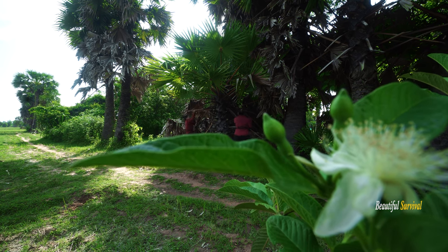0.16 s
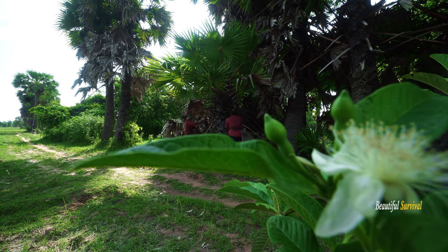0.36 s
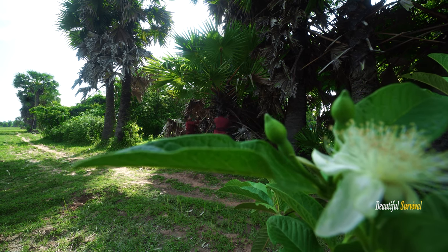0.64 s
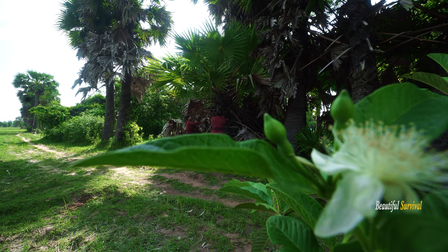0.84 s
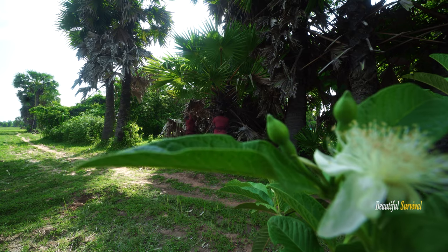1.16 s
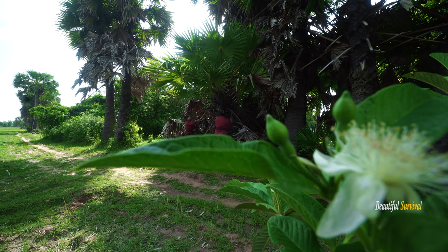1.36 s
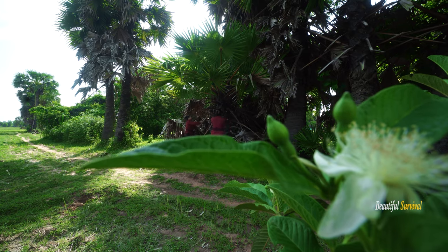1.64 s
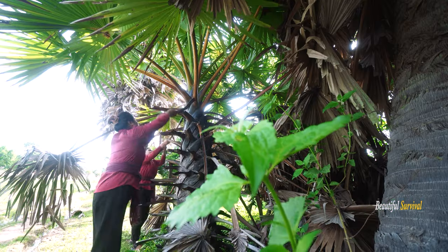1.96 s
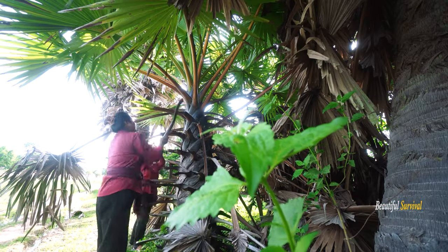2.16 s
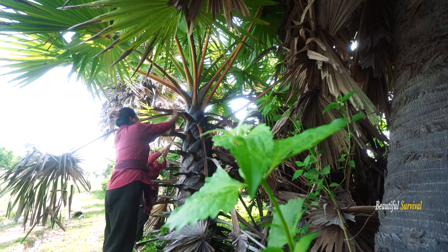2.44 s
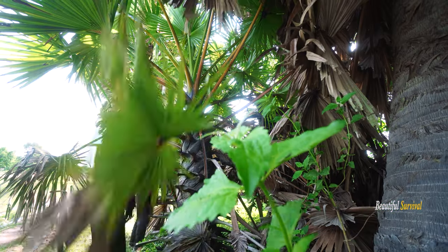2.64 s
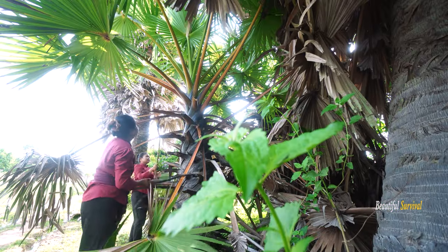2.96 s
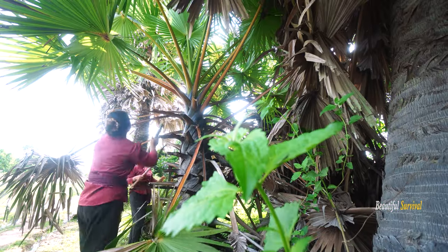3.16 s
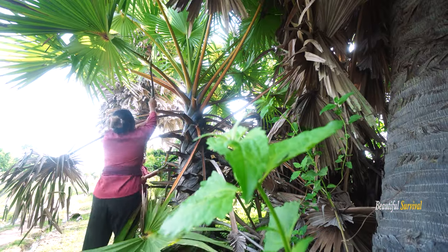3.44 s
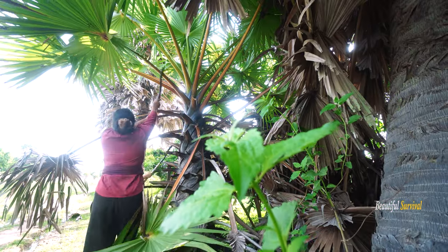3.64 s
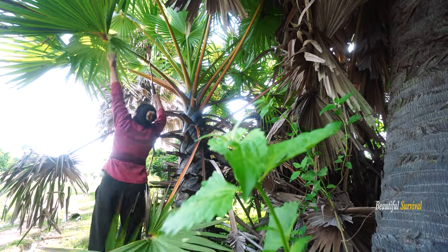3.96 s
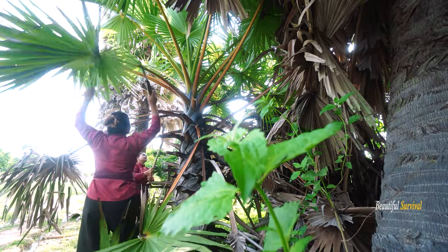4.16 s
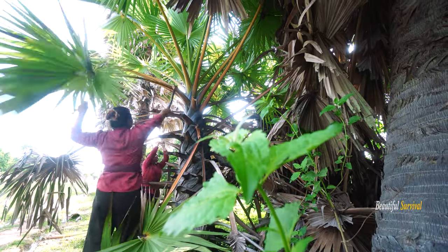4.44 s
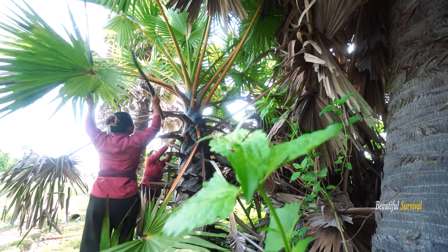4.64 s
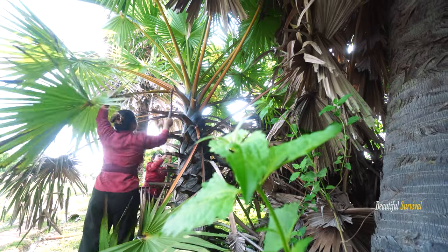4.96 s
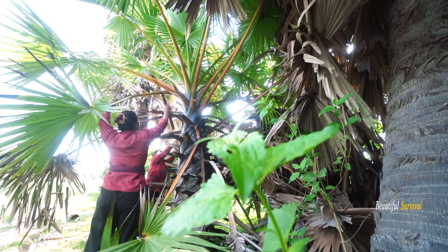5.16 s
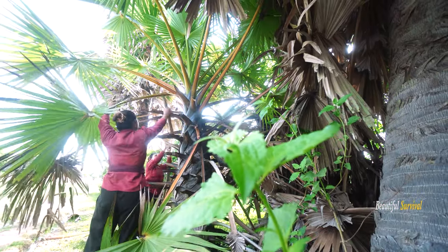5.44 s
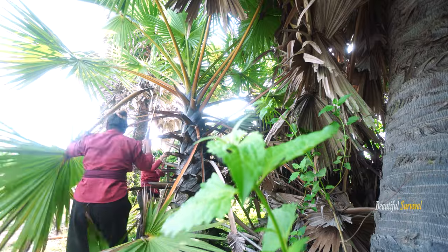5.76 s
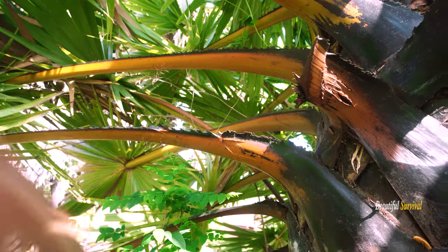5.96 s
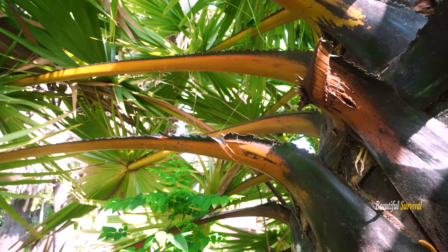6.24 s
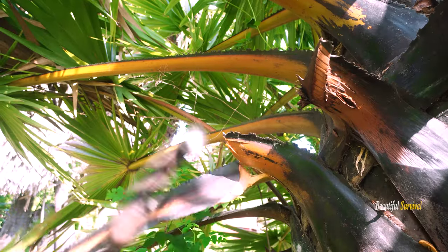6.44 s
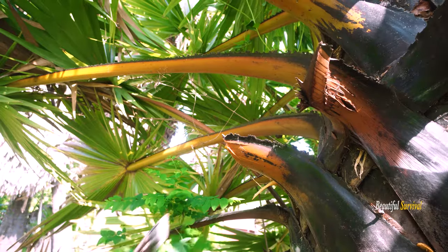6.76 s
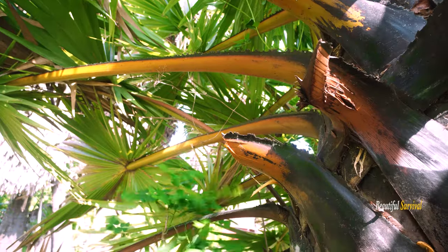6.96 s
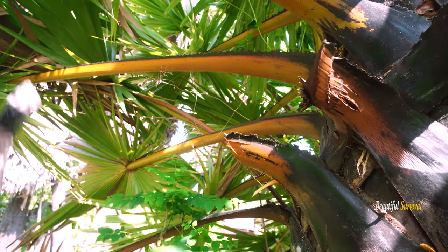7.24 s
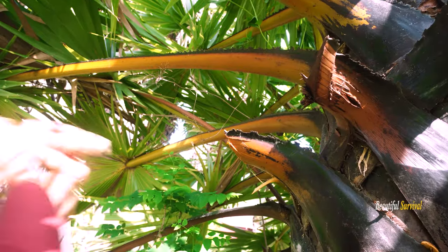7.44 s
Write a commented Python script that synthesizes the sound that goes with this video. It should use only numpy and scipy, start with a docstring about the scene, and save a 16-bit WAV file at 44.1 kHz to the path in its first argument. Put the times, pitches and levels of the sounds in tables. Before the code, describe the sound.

A quiet outdoor grove with soft air and a faint, distant hum rising in small swells. From 0 to 2 s, a few weak, distant knife chops fall around 0.7, 1.3 and 1.7 s, with dry leaf clicks and slight rustling. From 2 s the work is nearer: woody knocks at 2.4 to 2.9 s with crisp fibre cracks, clacking stalks and stiff leaves swishing. Between 3.4 and 3.8 s the blade rasps lightly to and fro, and thin, high bird whistles appear until about 5.2 s. Separate chops follow at 4.0, 4.4, 4.6, 4.9, 5.2, 5.5 and 5.7 s. At 6 s everything becomes much louder and close: heavy resonant hacks two to four times a second, splitting wood, tearing fibres, very sharp snaps, and a strong dry frond rustle peaking around 6.4 to 6.9 s. Final hard blows land at 7.0, 7.4 and 7.6 s, with a short woody echo.

```python
"""Cutting palm fronds with a heavy knife

Outdoors, fronds are hacked off a fan palm: first some way off, then much louder, right beside the stalk.
Each blow sets off decaying notes and resonances for the stalk, and showers of tiny cracks for its fibres.
Filtered noise and cracks make the stiff leaves rustle, snap and slide; rough noise makes the blade rasp.
Behind lie still air (soft noise), a climbing hum over a steady tone, and thin bird whistles (gliding sines).
"""
import sys
import numpy as np
from scipy import signal
from scipy.io import wavfile

SR = 44100
rng = np.random.default_rng(int(sys.argv[2]) if len(sys.argv) > 2 else 0)


def transcribe(u):
    """Save the signal u as a 16-bit wav file named by the first command-line argument.

    u: samples, shape (n,) or (channels, n), limited to [-1, 1]; the rate is SR.
    q: integer samples, one column per channel.
    """
    v = np.clip(np.atleast_2d(u).T, -1, 1)
    q = np.round(v * 32767).astype(np.int16)
    wavfile.write(sys.argv[1], SR, q)


N = 335160
TIME = np.arange(N) / SR   # seconds

# Levels in the event tables are starting points: the functions trim and filter them further.
# knife blows: [t/s, thud level/dB, knock level/dB, first crack level/dB, tearing fibres level/dB,
#               extra treble level/dB, cutting time t/s, thud of the frond f/Hz, note of the stalk f/Hz]
KNIFE_BLOWS = [(0.687, -32.5, -32, -17, -24.5, -3.5, 0.041, 489, 888),
               (0.8443, -39, -36.5, -25, -30.5, 9, 0.019, 297, 2880),
               (1.297, -29.5, -33, -22, -24.5, 0.5, 0.032, 504, 3390),
               (1.6359, -37.5, -43, -23.5, -33.5, 10, 0.038, 337, 3140),
               (1.705, -30, -33.5, -19, -25, -0.5, 0.03, 515, 830),
               (2.406, -30.5, -25.5, -21, -37.5, 6, 0.015, 255, 1560),
               (2.5145, -28, -32.5, -15.5, -29.5, 1.5, 0.073, 363, 1120),
               (2.575, -29, -25, -26, -40, -13, 0.0045, 705, 2800),
               (2.853, -29.5, -33, -20, -29.5, 4.5, 0.0077, 393, 1571),
               (2.877, -27.5, -30.5, -15, -26.5, -6, 0.021, 412, 825),
               (4.001, -25.5, -29.5, -27, -37, 0, 0.0036, 636, 1015),
               (4.4344, -31, -29.5, -12.5, -33, -5, 0.021, 640, 1860),
               (4.642, -29, -27, -17, -25.5, -4, 0.013, 567, 2660),
               (4.86, -26.5, -24.5, -17, -27, -21, 0.0029, 569, 3440),
               (5.2458, -26.5, -27.5, -19.5, -27, 3, 0.016, 700, 1040),
               (5.5404, -27.5, -28, -20, -29, 0.5, 0.034, 580, 1400),
               (5.6534, -26.5, -27.5, -13.5, -26, -12, 0.027, 414, 975),
               (5.982, -22, -20, -5.5, -16.5, -3, 0.049, 401, 1270),
               (6.066, -18.5, -20, -20, -18.5, 1.5, 0.027, 486, 1020),
               (6.3145, -21.5, -15.5, -11, -17.5, 2.5, 0.027, 480, 1510),
               (6.408, -23.5, -25.5, 1, -33, -5, 0.022, 560, 1490),
               (6.655, -21, -16.5, -13, -13, -18, 0.016, 466, 1490),
               (6.711, -21.5, -20.5, -10, -19, 2.5, 0.0074, 541, 810),
               (7.018, -17.5, -15.5, -13, -14.5, -1.5, 0.011, 491, 1540),
               (7.3635, -22, -16, -17, -16.5, -7.5, 0.02, 480, 1986),
               (7.5726, -19, -22, -5, -18.5, -0.5, 0.054, 715, 1410)]
# leaf ribs snapping and stalks bumping: [t/s, wood level/dB, crackle level/dB, length t/s]
RIB_SNAPS = [(0.043, -41.5, -41, 0.005), (1.181, -59, -35.5, 0.012), (2.018, -36.5, -31.5, 0.012),
             (2.084, -38.5, -32, 0.006), (2.334, -38.5, -44, 0.0037), (2.482, -39, -31, 0.0045),
             (2.758, -38, -31, 0.0072), (2.959, -31.5, -27, 0.013), (3.396, -36, -32.5, 0.021),
             (3.541, -35.5, -34, 0.016), (3.685, -41.5, -36, 0.031), (3.959, -39, -48, 0.024),
             (4.554, -34, -25, 0.014), (4.768, -39.5, -43, 0.011), (4.816, -38.5, -41, 0.012),
             (5.855, -35, -23, 0.0046), (5.876, -29, -27, 0.0042), (5.928, -34, -38, 0.0066),
             (6.053, -18, -11, 0.0059), (6.207, -30.5, -23.5, 0.009), (6.645, -30, -15.5, 0.0027),
             (6.773, -27, -16, 0.0027), (7.2555, -32.5, -32, 0.0027)]
# single dry leaf pleats that click: [t/s, level/dB]
PLEAT_CLICKS = [(0.055, -31), (0.3908, -25), (0.629, -31), (0.886, -25), (1.899, -32.5), (2.098, -22.5),
                (3.884, -36), (4.152, -25.5), (4.381, -39), (4.793, -29), (5.05, -33.5), (6.0435, -10),
                (6.7515, -7), (6.918, -14), (6.976, -17.5), (7.002, -18), (7.2335, -23)]
# stalks clacking against each other: [t/s, level/dB, note f/Hz]
STALK_CLACKS = [(2.074, -30.5, 368), (2.617, -23, 604), (2.761, -25.5, 2720), (2.962, -23, 417),
                (3.039, -29, 2000), (3.378, -29, 614), (3.71, -36, 595), (3.96, -31, 1200),
                (5.876, -25, 1890), (6.721, -9, 2920)]
# the blade rasping to and fro in a hollow stalk: [t/s, length t/s, level/dB]
BLADE_STROKES = [(3.371, 0.061, -36.5), (3.527, 0.05, -36), (3.655, 0.074, -37.5), (3.739, 0.013, -36)]
# a frond is pulled or swings back: [t/s, time kept moving t/s, leaf rustle level/dB, stalk scrape level/dB]
FROND_PULLS = [(0.072, 0.1, -39.5, -54.5), (0.279, 0.31, -44.5, -55), (1.18, 0.048, -40.5, -62),
               (1.77, 0.038, -41, -63), (1.997, 0.16, -40, -42), (2.561, 0.13, -24.5, -36),
               (2.748, 0.053, -25, -30.5), (2.989, 0.077, -34, -44.5), (3.048, 0.084, -28, -35),
               (3.499, 0.081, -40, -46), (3.977, 0.04, -42.5, -38), (4.076, 0.07, -47, -48),
               (4.46, 0.075, -42.5, -40), (4.688, 0.04, -29, -39), (5.031, 0.077, -48, -49),
               (5.281, 0.099, -33, -36.5), (5.671, 0.14, -37, -37), (5.85, 0.113, -41, -39.5),
               (6.1, 0.072, -27.5, -32), (6.279, 0.1, -23, -28), (6.415, 0.079, -14.5, -21.5),
               (6.501, 0.11, -13, -25), (6.715, 0.097, -18, -22), (6.794, 0.095, -15, -27.5),
               (7.072, 0.068, -28.5, -30.5), (7.41, 0.057, -40.5, -42), (7.548, 0.008, -29.5, -44.5)]
# the crown keeps stirring between pulls: [t/s, leaf rustle level/dB]
CROWN_STIR = [(0, -46.5), (0.22, -54.5), (0.8, -52.5), (1.1, -47), (1.42, -51.5), (1.62, -66.5),
              (1.85, -48.5), (1.97, -52.5), (2.25, -44.5), (2.4, -51.5), (2.85, -33), (3.25, -47.5),
              (4.24, -44.5), (4.33, -56.5), (4.93, -46), (5.22, -49), (6.7, -26.5), (7.23, -37),
              (7.33, -45.5)]
# dull bumps through the trunk: [t/s, level/dB]
TRUNK_BUMPS = [(6.054, -25), (6.411, -26), (6.711, -30)]
# thin bird whistles: [t/s, length t/s, start f/Hz, end f/Hz, level/dB]
BIRD_WHISTLES = [(3.59, 0.045, 10100, 8900, -45), (3.795, 0.05, 8700, 8500, -46.5),
                 (3.94, 0.04, 10100, 9150, -45), (4.057, .09, 8150, 8550, -51),
                 (4.585, 0.082, 8350, 8000, -47), (5.03, 0.12, 8900, 9400, -49),
                 (5.165, 0.056, 8650, 8400, -51)]
# swells of the distant hum: [t/s, length t/s, start f/Hz, end f/Hz, level at the start/dB]
HUM_SWELLS = [(0, .2, 311, 327, -56.5), (0.235, 0.35, 271, 339, -53), (0.885, 0.38, 283, 336.5, -56),
              (1.3, 0.26, 285, 340, -60), (1.8, 0.296, 279, 346, -55), (4.295, 0.13, 272, 298, -51)]

# Resonances, with levels relative to each other.
# the stalk at first contact: [f/Hz, width f/Hz, level/dB]
CONTACT_MODES = [(1486, 150, 4), (1796, 100, 5.5), (3620, 330, -9)]
# the frond stalk as it splits: [f/Hz, width f/Hz, level/dB]
STALK_MODES = [(480, 47, 6), (640, 67, 1), (1291, 49, 4), (1500, 44, 9.5), (1730, 38, 2), (1980, 35, 10.5)]
# the hollow stalk, with the thin squeal of the blade on top: [f/Hz, width f/Hz, level/dB]
HOLLOW_MODES = [(610, 83, 4), (1200, 230, -4), (2700, 440, -6), (8440, 300, -9), (10000, 150, -6),
                (11300, 170, -1), (14400, 500, -10)]

# Spectra: only the shape matters, the overall level is evened out.
# the shaken frond, heavy and low: [f/Hz, level/dB]
THUD_SPECTRUM = [(50, -38.5), (130, -11.5), (220, -2.5), (330, -2), (500, 1), (800, -1.5), (1100, -5.5),
                 (2000, -20.5), (5000, -39)]
# knocked or splitting wood: [f/Hz, level/dB]
WOOD_SPECTRUM = [(200, -36), (600, -0.5), (1100, -0.5), (1800, 0.5), (2400, -0.5), (4000, -8.5),
                 (10000, -28.5)]
# tearing plant fibres: [f/Hz, level/dB]
FIBRE_SPECTRUM = [(300, -24), (1200, -9), (2400, 2.5), (3600, 2), (5500, -1), (7500, -2.5), (10000, 2),
                  (13000, -3), (16000, -4.5)]
# stiff, dry leaves: [f/Hz, level/dB]
LEAF_SPECTRUM = [(300, -23), (1200, -19), (2500, -3.5), (4000, -0.5), (6500, 0), (9500, 3.5), (12000, 2.5),
                 (16000, -3.5)]
# stalks dragged along something: [f/Hz, level/dB]
SCRAPE_SPECTRUM = [(40, -31), (120, -13), (220, -4), (350, 1.5), (600, 0.5), (1000, -1.5), (2000, -1),
                   (3000, -4), (8000, -21)]
# still outdoor air: [f/Hz, level/dB]
AIR_SPECTRUM = [(25, -17), (60, -13.5), (120, -6.5), (220, 1), (320, 1), (500, -6.5), (1000, -12.5),
                (1600, -31), (3000, -12.5), (6000, -26), (16000, -31)]

PULL_RISE_S, LEAF_SETTLE_T60_S, STALK_SETTLE_T60_S = 0.017, 0.17, 0.31   # shared by every pull
STIR_USUAL_DB, STIR_SCRAPE_DB = -47, -52.5   # usual leaf stirring, and the stalk scrape that goes with it
STIR_WANDER_DB, STIR_WANDER_PER_S = 2, 27
BOOM_HZ, BOOM_DB, BOOM_T60_S = 330, -10, 0.57
ECHO_DB = -21.5
DRONE_HZ, DRONE_DB = 442, -63.5   # the level wavers around this value
HUM_FADE_DB_PER_S, HUM_EDGE_S = 14, 0.013
AIR_DB = -56.5
CUTOFF_HZ = 15900


def chops():
    """Each blow knocks the stalk, shakes the frond and tears through fibres until the blade stops."""
    s, thud_db, knock_db, crack_db, tear_db, bright_db, cutting, low_hz, high_hz = np.transpose(KNIFE_BLOWS)
    s = s + 0.0005   # every blow sounds half a millisecond after its listed time
    latest = np.maximum(np.searchsorted(s, TIME) - 1, 0)   # which blow is under way

    # strong knocks land on the thick base, which rings more clearly
    ringing = np.clip(np.interp(knock_db, [-27, -17], [0.03, 0.7]), 0, 1)[latest]
    knock = ring(taps(s, knock_db, contact_s=0.013) * np.sqrt(ringing), CONTACT_MODES)

    # after a clean first bite the blade advances in jerks
    past_bite = np.clip((TIME - s[latest]) / 0.0093, 0, 1)
    jerks = from_db(1.96 * drift(170) * past_bite)
    split = jerks * bursts(s, knock_db + 2.5, 0.5 * cutting, t60=0.074) * grains(5000, spread_db=1.5)
    ringing_wood = ring(split * np.sqrt(ringing), STALK_MODES)
    dull_wood = colour(split * np.sqrt(1 - ringing), WOOD_SPECTRUM)

    # every stalk has a note of its own, and its heavy frond gives way a moment after the knock
    note = pings(s, knock_db + 6.0, high_hz, t60=0.037, rise_s=0.00054)
    thud = pings(s + 0.0024, thud_db + 3.5, low_hz, t60=0.075, rise_s=0.0011)
    shake = bursts(s + 0.0031, thud_db - 2.0, cutting, t60=0.12) * grains(9000, spread_db=1.0)

    crack_lengths = np.full(len(s), 0.0017)
    crack = bursts(s, crack_db - 4.0, crack_lengths, t60=0.013) * grains(25000, spread_db=3.0)
    tear = bursts(s, tear_db, cutting, t60=0.15) * crackle(14000, spread_db=1.5, clump_db=4.0)
    fibres = colour(crack, LEAF_SPECTRUM) + colour(jerks * tear, FIBRE_SPECTRUM)
    # dry fibres break brighter than green ones
    treble = signal.sosfilt(signal.butter(1, 7000, "high", fs=SR, output="sos"), fibres)
    fibres = fibres + treble * (from_db(bright_db[latest]) - 1)
    return knock + ringing_wood + dull_wood + note + thud + colour(shake, THUD_SPECTRUM) + fibres


def snaps():
    """Ribs break in short runs of tiny cracks, each with a little wood under it."""
    s, wood_db, crackle_db, length = np.transpose(RIB_SNAPS)
    wood = bursts(s, wood_db - 1.0, length, t60=0.047) * grains(5000, spread_db=-0.5)
    ribs = bursts(s, crackle_db - 4, length, t60=0.058) * crackle(9000, spread_db=4.5, clump_db=0.5)
    # the first rib gives way with the sharpest crack
    first = bursts(s, crackle_db + 3.0, np.zeros(len(s)), t60=0.033) * rng.standard_normal(N)
    knock = from_db(1.5) * colour(wood, WOOD_SPECTRUM)
    thud = from_db(-5.0) * colour(wood, THUD_SPECTRUM)
    return knock + thud + colour(first + ribs, LEAF_SPECTRUM)


def clicks():
    """A lone pleat pops through: one bright click that dies away at once."""
    s, db = np.transpose(PLEAT_CLICKS)
    pops = bursts(s, db, np.zeros(len(s)), t60=0.024) * rng.standard_normal(N)
    return colour(pops, LEAF_SPECTRUM)


def clacks():
    """Stalks collide: a brief rough contact, and the short note of the stalk that is hit."""
    s, db, hz = np.transpose(STALK_CLACKS)
    contact = bursts(s, db - 8, np.full(len(s), 0.002), t60=0.032) * grains(6000, spread_db=-3.0)
    flutter = from_db(1.9 * drift(400))
    return colour(contact, WOOD_SPECTRUM) + pings(s, db, hz, t60=0.039, rise_s=0.00053) * flutter


def rasps():
    """The edge catches on fibres through each stroke, so the hollow stalk sounds and the steel squeals."""
    stroke = np.zeros(N)
    for s, length, db in BLADE_STROKES:
        progress = np.clip((TIME - s) / length, 0, 1)
        stroke += from_db(db) * np.sin(np.pi * progress)
    return ring(stroke * grains(900, spread_db=4.0), HOLLOW_MODES)


def fronds():
    """Stiff leaflets rub, flick and crack; the harder they move, the denser the crackle."""
    leaf, scrape = frond_motion()
    leaf_db = 20 * np.log10(leaf)
    vigour = (leaf / from_db(-45)) ** 0.5
    rub = from_db(-2.5) * leaf * crackle(4500 * vigour, spread_db=0.5, clump_db=2.0)
    ticks = from_db(-9) * leaf * flicks(110 * vigour, spread_db=2.6, width_hz=1600)
    cracks = from_db(-5.5) * leaf * creases(38 * vigour, spread_db=2.8, t60=0.006)
    # a hard pull also strains the thicker fibres, which sound lower than the leaf tips
    strain = np.clip(np.interp(leaf_db, [-28, -12], [0.05, 0.45]), 0, 1)
    tips = colour(rub * (1 - strain) + ticks + 0.5 * cracks, LEAF_SPECTRUM)
    thick = colour(rub * strain + 0.5 * cracks, FIBRE_SPECTRUM)
    drag = from_db(-2.0) * grains(1800 * vigour, spread_db=1.0) * from_db(2.87 * drift(70))
    return tips + thick + colour(scrape * drag, SCRAPE_SPECTRUM)


def frond_motion():
    """Strength of leaf rustle and of stalk scrape: the pulls on top of a restless stirring."""
    s, length, leaf_db, scrape_db = np.transpose(FROND_PULLS)
    stir_db = np.interp(TIME, *np.transpose(CROWN_STIR)) + STIR_WANDER_DB * drift(STIR_WANDER_PER_S)
    stir_scrape_db = STIR_SCRAPE_DB + stir_db - STIR_USUAL_DB
    leaf = pulled(s, length, leaf_db, LEAF_SETTLE_T60_S) + from_db(stir_db) ** 2
    scrape = pulled(s, length, scrape_db, STALK_SETTLE_T60_S) + from_db(stir_scrape_db) ** 2
    return np.sqrt(leaf), np.sqrt(scrape)


def pulled(starts, lengths, levels_db, t60):
    """Power of the pulls: each gathers speed, keeps moving, then settles."""
    power = np.zeros(N)
    for s, length, db in zip(starts, lengths, levels_db):
        gather = np.clip((TIME - s) / PULL_RISE_S, 0, 1)
        settle = np.clip((TIME - s - length) / t60, 0, 3)
        power += (from_db(db - 60 * settle) * gather) ** 2
    return power


def flicks(per_s, spread_db, width_hz, count=16):
    """Leaflets spring free at random; each ticks at one of several pitches and buzzes for an instant."""
    starts, dealt = grains(per_s, spread_db), rng.integers(0, count, N)
    ticks = np.zeros(N)
    for k, hz in enumerate(np.geomspace(2800, 14500, count)):
        b, a = signal.iirpeak(hz, hz / width_hz, fs=SR)
        ticks += signal.lfilter(b, a, starts * (dealt == k) + 1e-18)
    age = TIME[:SR // 40]
    buzz = rng.standard_normal(len(age)) * from_db(-60 * age / 0.039)
    return rms_one(through(ticks, buzz))


def creases(per_s, spread_db, t60):
    """Dry pleats buckle at random, each with one sharp crack of noise that quickly decays."""
    kept_per_sample = from_db(-120 / (t60 * SR))   # acts on power: 60 dB down after t60
    power = signal.lfilter([1], [1, -kept_per_sample], grains(per_s, spread_db) ** 2 + 1e-18)
    return rms_one(np.sqrt(power) * rng.standard_normal(N))


def bumps(hz=65, t60=0.062, gain_db=-5):
    """The trunk gives a soft, quickly damped low swing, its pitch varied from bump to bump."""
    out = np.zeros(N)
    for s, db in TRUNK_BUMPS:
        age = np.maximum(TIME - s, 0)
        fade = from_db(db + gain_db - 60 * np.minimum(age / t60, 10))
        out += fade * np.sin(2 * np.pi * hz * rng.uniform(0.99, 1.4) * age)
    return out


def grove(x, t60, gap_s, dull_hz):
    """Trunks and leaves scatter a short, duller tail after a small gap."""
    age = TIME[:SR // 2]
    scatter = rng.standard_normal(len(age)) * from_db(-60 * age / t60) * (age > gap_s)
    return through(x, signal.sosfilt(signal.butter(1, dull_hz, fs=SR, output="sos"), scatter))


def boom(x):
    """The low notes of the blows, one octave of them, hang between the trunks."""
    octave = [BOOM_HZ / np.sqrt(2), BOOM_HZ * np.sqrt(2)]
    low = signal.sosfilt(signal.butter(2, octave, "band", fs=SR, output="sos"), x)
    tail = rng.standard_normal(SR) * from_db(-60 * TIME[:SR] / BOOM_T60_S)
    return from_db(BOOM_DB) * through(low, tail)


def whistles():
    """Each bird whistle is a thin sine that glides, wobbles slightly, swells and fades."""
    out = np.zeros(N)
    for s, length, start_hz, end_hz, db in BIRD_WHISTLES:
        progress = np.clip((TIME - s) / length, 0, 1)
        glide = start_hz + (end_hz - start_hz) * progress + 45 * drift(300)
        out += from_db(db) * np.sin(np.pi * progress) * np.sin(2 * np.pi * np.cumsum(glide) / SR)
    return out


def hum():
    """Each swell of the distant hum climbs steadily in pitch as it fades; a steady tone lies behind."""
    out, waver = np.zeros(N), 1 + 0.0053 * drift(29.6)
    for s, length, start_hz, end_hz, db in HUM_SWELLS:
        age = np.clip(TIME - s, 0, length)
        pitch = (start_hz + (end_hz - start_hz) * age / length) * waver
        edges = np.clip(np.minimum(age, length - age) / HUM_EDGE_S, 0, 1)
        fade = from_db(db - HUM_FADE_DB_PER_S * age)
        out += edges * fade * np.sin(2 * np.pi * np.cumsum(pitch) / SR)
    drone = from_db(DRONE_DB + 1.3 * drift(4.5)) * np.sin(2 * np.pi * DRONE_HZ * TIME)
    return out * from_db(1.5 * drift(11)) + drone


def still_air():
    """Still air is a soft, steady noise."""
    return from_db(AIR_DB) * colour(rng.standard_normal(N), AIR_SPECTRUM)


def ring(force, modes):
    """A struck body rings in its damped modes; a wider mode dies away sooner."""
    age = TIME[:SR // 4]
    response = np.zeros(len(age))
    for k, (hz, width, db) in enumerate(modes):
        swing = np.exp(-np.pi * width * age) * np.cos(2 * np.pi * hz * age)
        response += (-1) ** k * from_db(db) * width * swing
    return through(force, response)


def pings(starts, levels_db, pitches_hz, t60, rise_s):
    """One damped swing for each strike, at a pitch of its own."""
    out = np.zeros(N)
    for start, db, hz in zip(starts, levels_db, pitches_hz):
        at = int(start * SR)
        age = TIME[:min(N - at, SR // 4)]
        envelope = from_db(db - 60 * age / t60) * (1 - np.exp(-age / rise_s))
        out[at:at + len(age)] += envelope * np.sin(2 * np.pi * hz * age)
    return out


def taps(starts, levels_db, contact_s):
    """Single impulses, each with the energy of its level held for the contact time."""
    force = np.zeros(N)
    force[(starts * SR).astype(int)] = from_db(levels_db) * np.sqrt(contact_s * SR)
    return force


def bursts(starts, levels_db, lengths, t60):
    """Envelope of sudden bursts that hold for their length and then die away."""
    power = np.zeros(N)
    for start, db, length in zip(starts, levels_db, lengths):
        at = int(start * SR)
        age = TIME[:min(N - at, SR // 2)]
        power[at:at + len(age)] += from_db(db - 60 * np.maximum(age - length, 0) / t60) ** 2
    return np.sqrt(power)


def crackle(per_s, spread_db, clump_db, count=7):
    """Fractures in several pitch bands, each with clumps and swells of its own plus shared ones."""
    edges = np.geomspace(250, 18000, count + 1)   # Hz
    shared, out = drift(330), np.zeros(N)
    for low, high in zip(edges, edges[1:]):
        clumps = 0.53 * shared + 0.63 * drift(260) + 0.5 * drift(35)
        fractures = grains(per_s * (high / edges[-1]) ** 0.5, spread_db) * from_db(clump_db * clumps)
        out += signal.sosfilt(signal.butter(2, [low, high], "band", fs=SR, output="sos"), fractures)
    return rms_one(out)


def grains(per_s, spread_db):
    """Tiny fractures at random moments; a larger spread makes their sizes more unequal; power 1."""
    chance = np.clip(per_s / SR, 0, 1) * np.ones(N)
    sizes = from_db(spread_db * np.minimum(rng.exponential(1, N), 4)) * rng.choice([-1, 1], N)
    happens = rng.random(N) < chance
    # dividing keeps the power even where fractures are rare
    return rms_one(happens * sizes / np.sqrt(chance + 1e-9))


def colour(x, spectrum, size=4096):
    """Filter without pre-echo (minimum phase) to the given spectrum; white noise keeps its power."""
    hz, db = np.transpose(spectrum)
    bins = np.abs(np.fft.fftfreq(size, 1 / SR)) + 1   # the 1 avoids log(0)
    log_gain = np.log(from_db(np.interp(np.log(bins), np.log(hz), db)))
    return through(x, np.fft.ifft(np.exp(np.conj(signal.hilbert(log_gain)))).real)


def through(x, response):
    """Pass a sound through an impulse response scaled to unit energy."""
    return signal.fftconvolve(x, response / np.linalg.norm(response))[:N]


def drift(per_s):
    """Random wander of typical size 1, in straight lines between random points."""
    knots = rng.standard_normal(int(N / SR * per_s) + 4)
    return rms_one(np.interp(TIME * per_s, np.arange(len(knots)), knots))


def rms_one(x):
    """Scale to unit power."""
    return x / np.sqrt(np.mean(x ** 2) + 1e-20)


def from_db(db):
    """Decibels to gain."""
    return 10 ** (np.asarray(db) / 20)


def scene():
    """The cutting work with its echo, over the quiet plantation."""
    blows = chops()
    work = blows + snaps() + clicks() + clacks() + rasps() + fronds()
    echo = from_db(ECHO_DB) * grove(work, t60=0.45, gap_s=0.011, dull_hz=7040)
    background = whistles() + hum() + still_air()
    return (work + echo + boom(blows) + bumps() + background)[None]


def record(dry):
    """The highest peaks are rounded and the top treble is cut."""
    rounded = dry / (1 + np.abs(dry) ** 4) ** (1 / 4)
    return signal.sosfilt(signal.ellip(10, 0.2, 70, CUTOFF_HZ, fs=SR, output="sos"), rounded)


dry = scene()
out = record(dry)
transcribe(out)
```